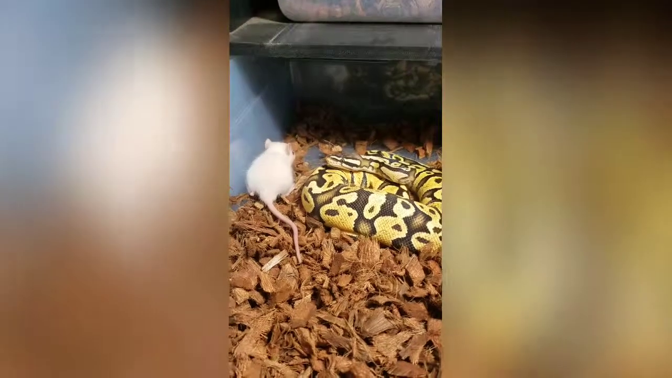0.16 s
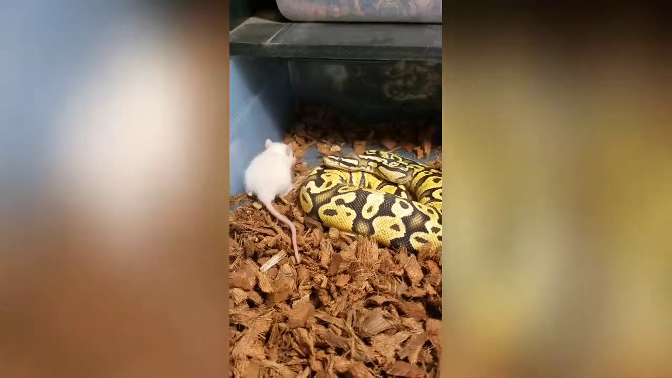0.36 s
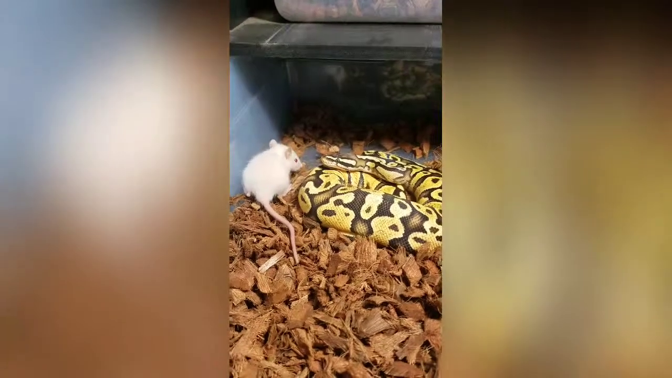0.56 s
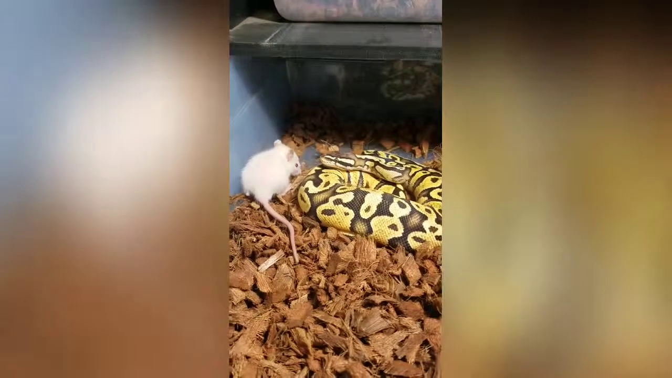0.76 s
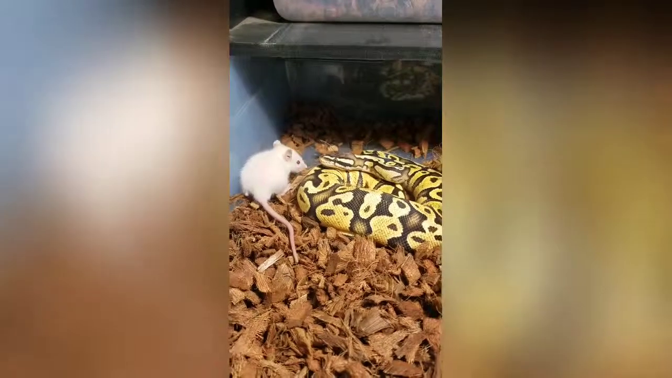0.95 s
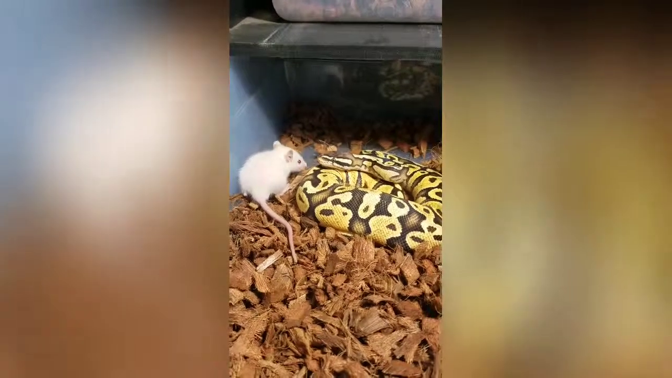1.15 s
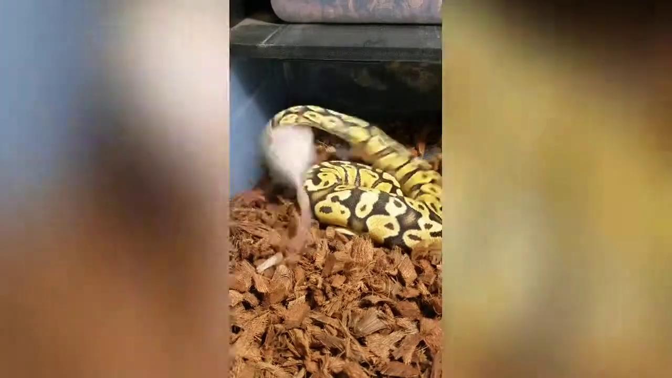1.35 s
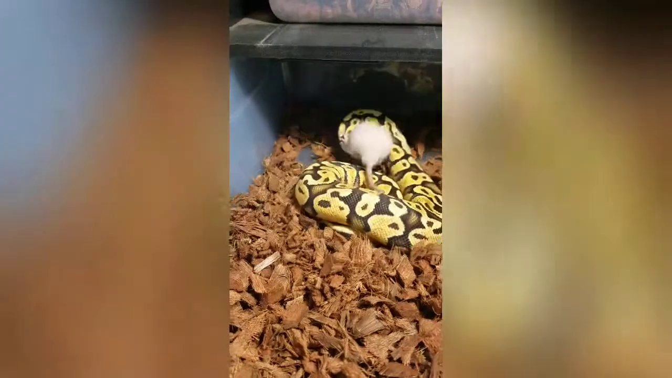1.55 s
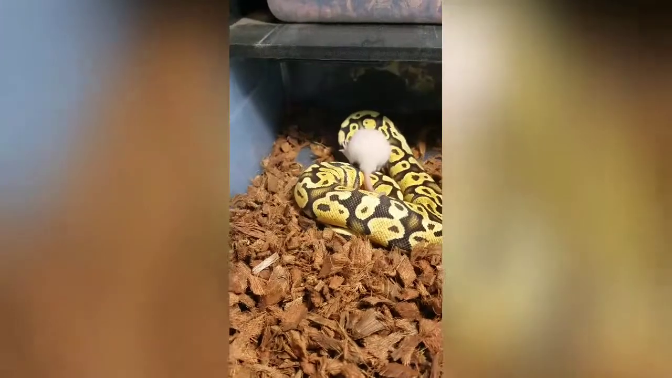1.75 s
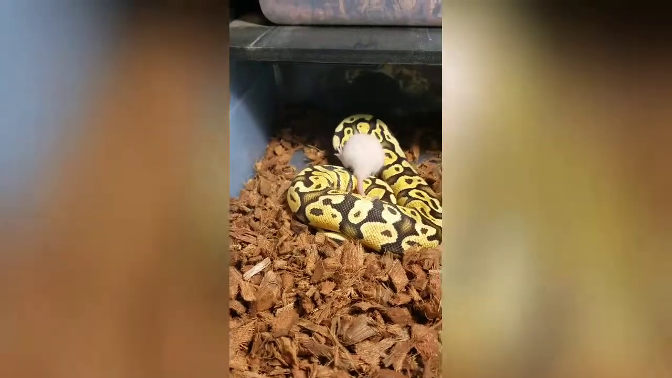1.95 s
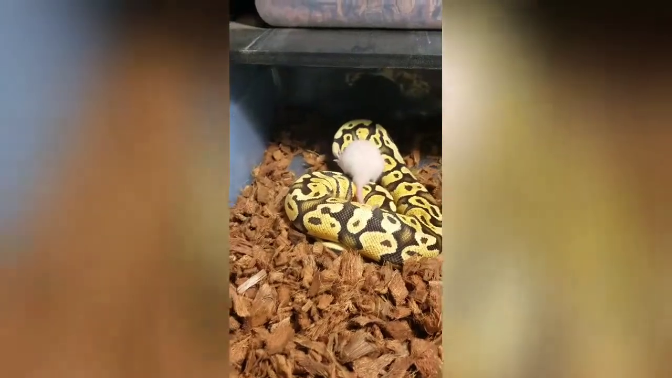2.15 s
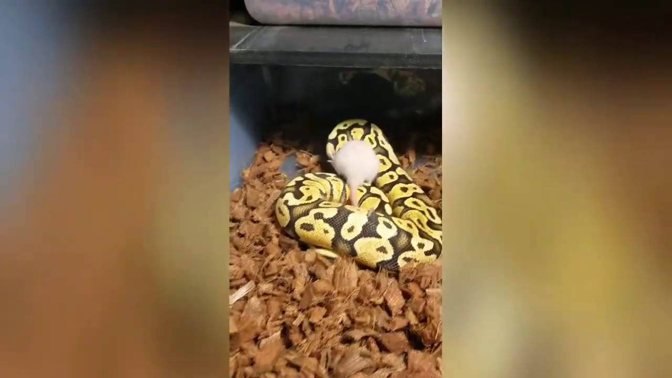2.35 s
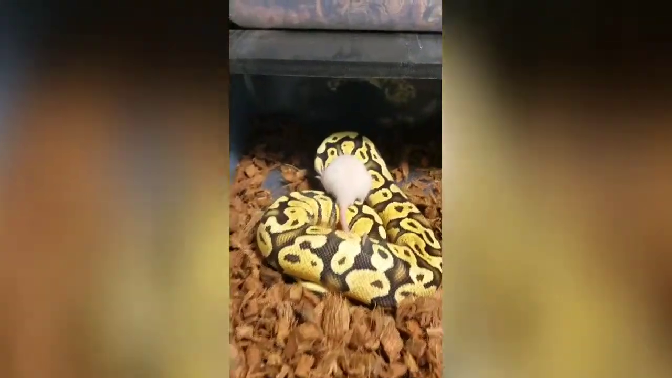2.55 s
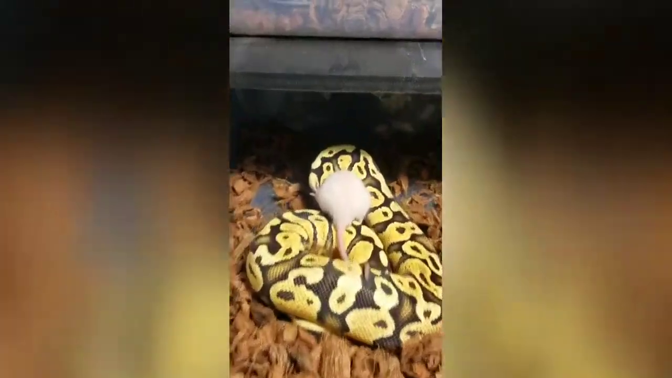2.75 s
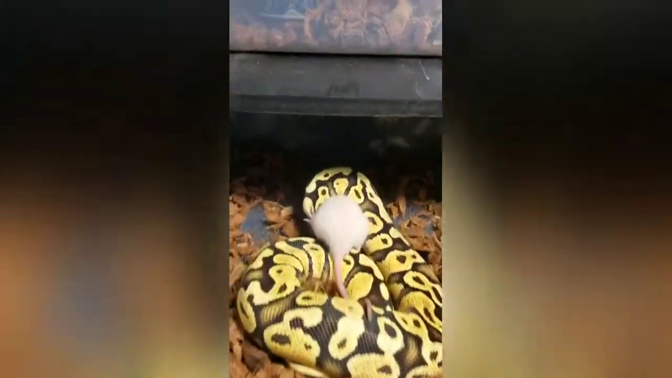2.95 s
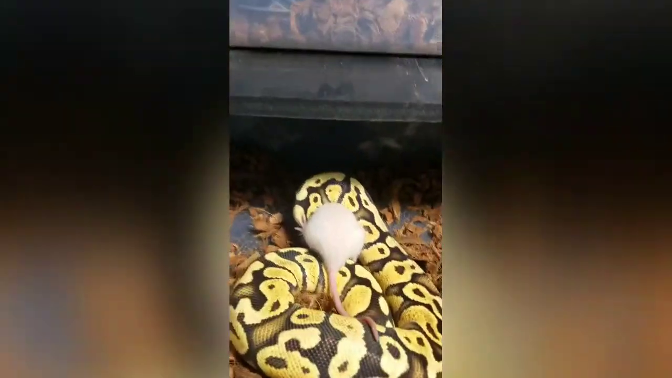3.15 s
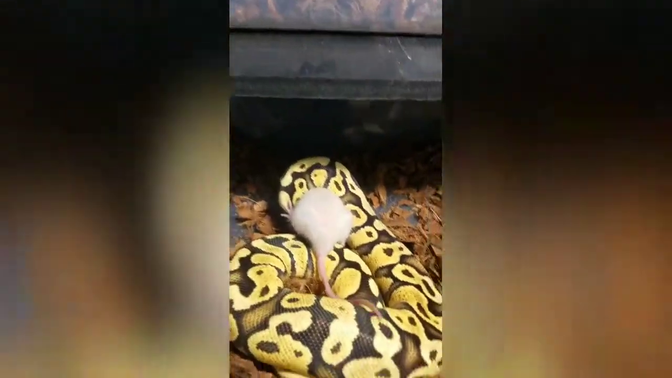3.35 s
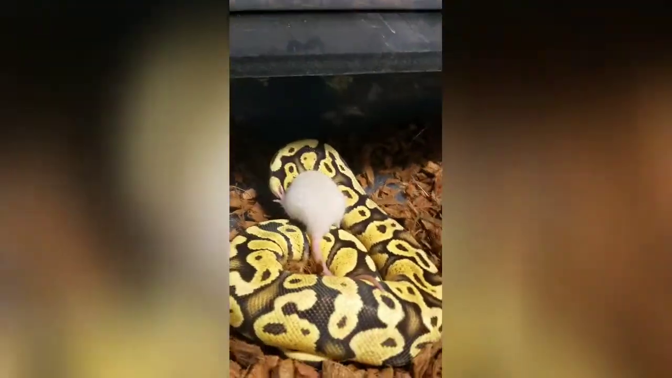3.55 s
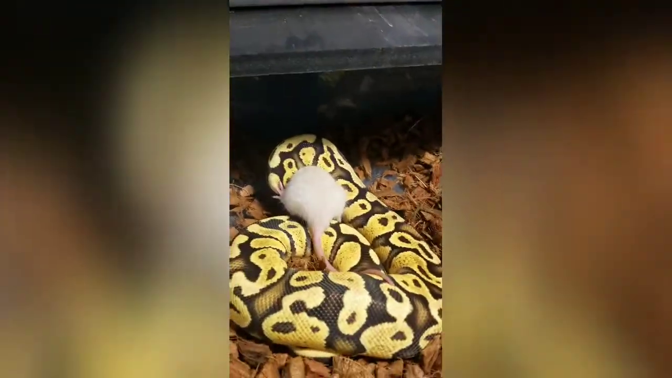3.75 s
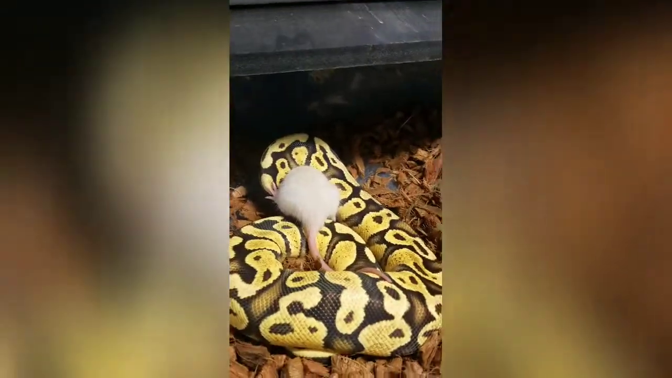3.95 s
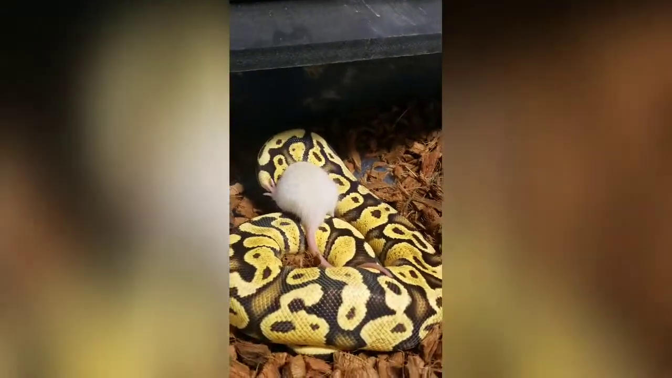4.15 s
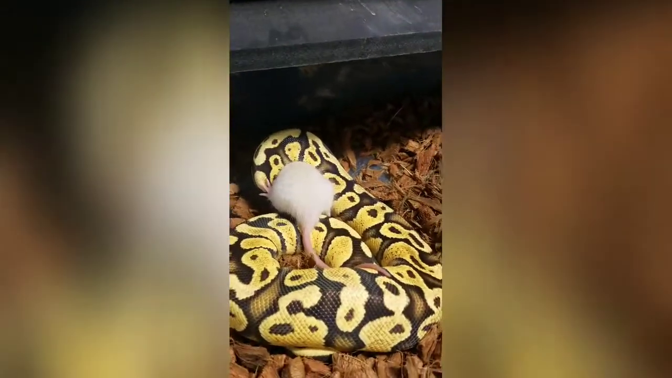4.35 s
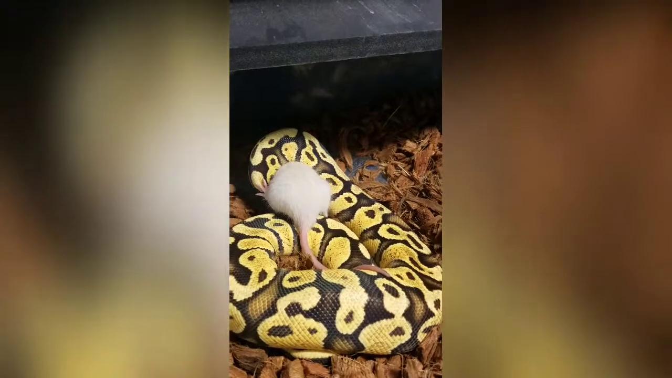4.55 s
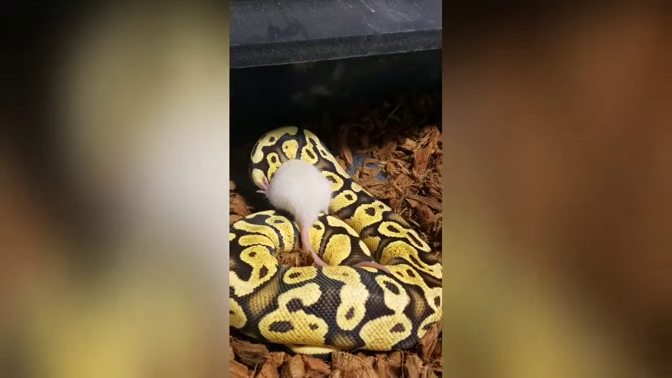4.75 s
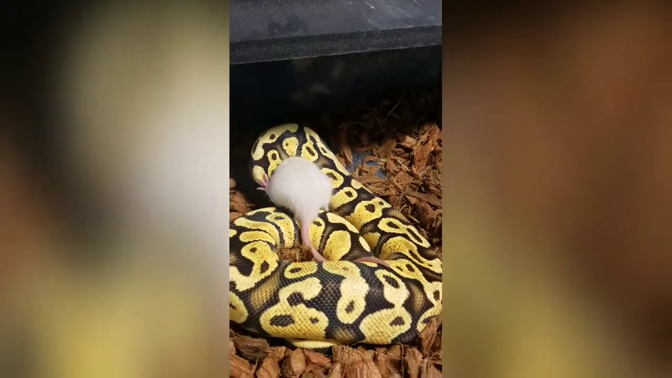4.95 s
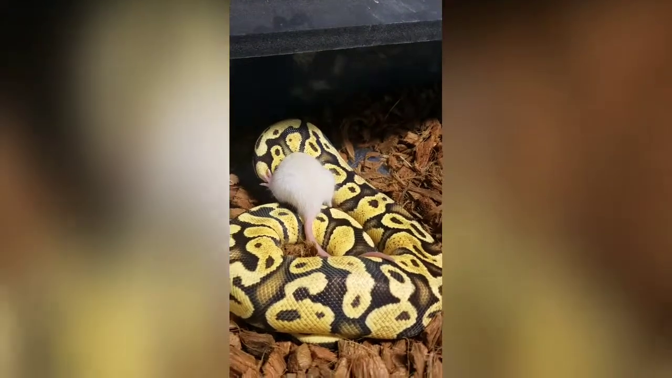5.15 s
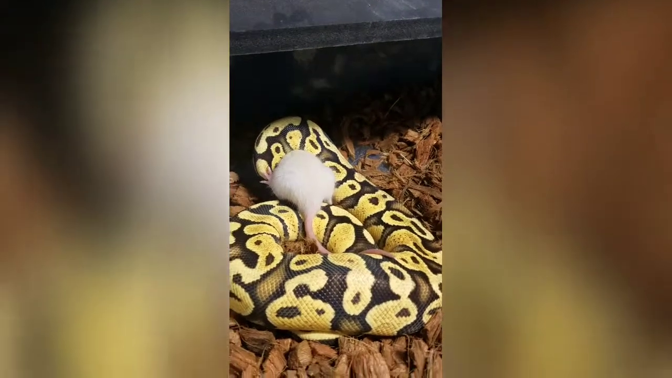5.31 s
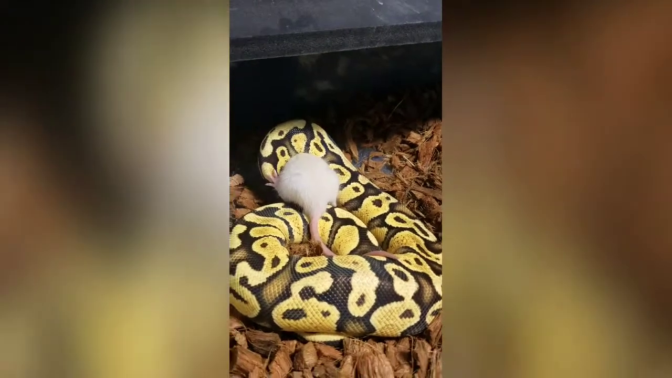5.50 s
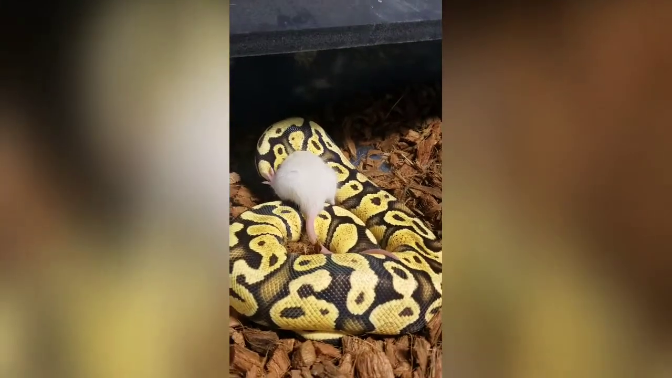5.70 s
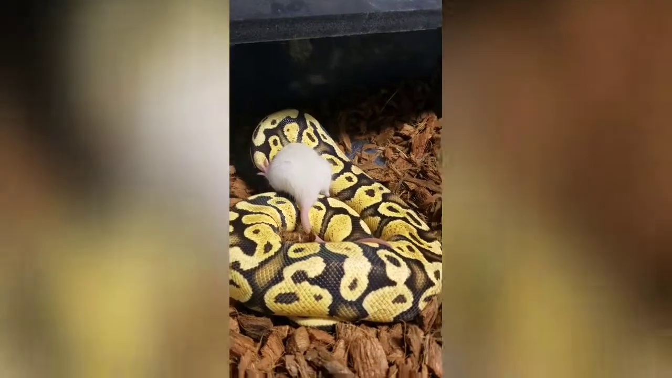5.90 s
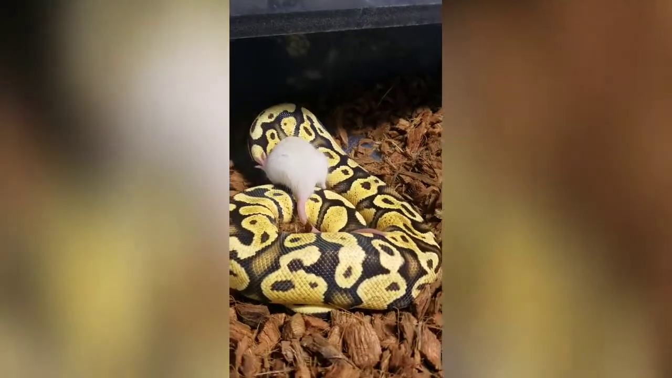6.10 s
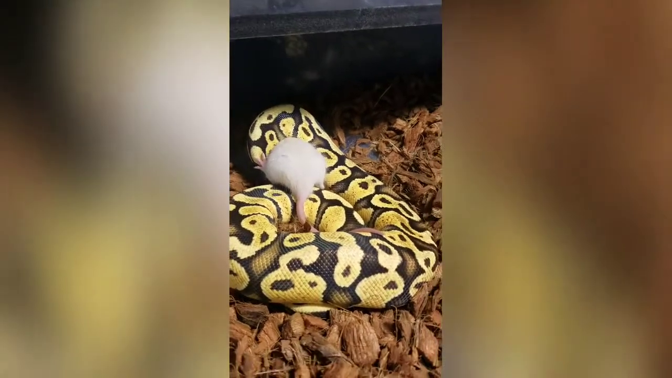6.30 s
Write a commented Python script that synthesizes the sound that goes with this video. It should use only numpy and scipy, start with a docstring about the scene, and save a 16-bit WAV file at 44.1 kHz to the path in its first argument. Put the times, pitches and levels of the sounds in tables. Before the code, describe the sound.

In a quiet room, a snake strikes with a dull boom on a plastic tub and a crackle of bark chips. A mouse at once gives a shrill, trembling squeal and a short squeak. After a pause come four more squeals, each starting raspy and clearing to a whistle, the later ones breaking into small whimpers. Bedding rustles faintly and knocks now and then, all close to the microphone.

```python
"""Snake strikes a mouse in a tub.

The plastic tub booms, close by in a quiet room. The mouse's vocal folds ring its throat in six shrill
squeals that start rasping, clear to a trembling whistle and, as it tires, break into whimpers.
Bark chips rustle and knock as the coils tighten. The recorder adds faint aliasing whistles to the cries."""
import sys
import numpy as np
from scipy import signal
from scipy.fft import rfft, irfft, next_fast_len
from scipy.io import wavfile
from scipy.ndimage import uniform_filter1d

SR = 44100
rng = np.random.default_rng(int(sys.argv[2]) if len(sys.argv) > 2 else 0)


def generate_wav(signal):
    """Clip the signal to [-1, 1] and save it as 16-bit WAV at the path in sys.argv[1]."""
    frames = np.transpose(np.atleast_2d(signal))
    scaled = np.clip(frames, -1, 1) * 32767
    pcm = np.round(scaled).astype(np.int16)
    wavfile.write(sys.argv[1], SR, pcm)


N = 280917
TIME_S = np.arange(N) / SR
TREMOR_HZ = 63.36
HALF_PER_ROUGH = 0.48  # strain doubles the period: half-pitch share per unit roughness

# squeals: t/s, length/s, attack/s, effort/dB, fade/dB, pitch/Hz, fundamental/dB, rasp/s, rasp offset/Hz,
# tremor/pitch, tremor/s, hoarseness/0-1, sag/s, sag/Hz, falter dip/dB
SQUEALS = [(1.391, 0.419, 0.034, -11, 4, 2111, 6.5, 0.079, -39.5, 0.048, 0.96, 0.13, 0.054, 212, -3),
           (2.103, 0.1, 0.0098, -14, 2.5, 2252, -3.5, 0.03, -140, 0.027, 0.6, 0.57, 0.0042, 33, 4),
           (3.575, 0.42, 0.015, -14.5, 9.5, 2133, 5, 0.07, 60.5, 0.037, 0.21, 0.22, 0.01, 10, 7),
           (4.285, 0.35, 0.0039, -13, 10.5, 2109, 3, 0.032, -130, 0.021, 0.15, 0.11, 0.068, 163, 0.5),
           (4.957, 0.333, 0.0031, -15.5, 10, 2066, 4.5, 0.05, -130, 0.039, 0.076, 0.17, 0.13, 210, 6.5),
           (5.708, 0.27, 0.0039, -14.5, 10, 2068, -0.5, 0.065, -60, 0.02, 0.087, 0.16, 0.11, 215, 6)]
# lurches within squeals: t/s, half-width/s, pitch jump/Hz, added roughness/0-1, surge/dB
LURCHES = [(1.449, 0.016, 290, 0.35, 1.5), (1.531, 0.008, -19.5, 0.4, -5), (1.593, 0.018, -85, 0.01, -1.5),
           (1.668, 0.04, 95.5, 0.08, 0), (1.793, 0.015, 23, 0.47, -7), (3.603, 0.016, 259, 0.06, 2.5),
           (3.879, 0.008, 12, 0.34, -1), (3.95, 0.044, 126, 0.56, -2), (4.489, 0.024, -25, 0.06, -0.5),
           (4.535, 0.018, 65.5, 0.38, -1.5), (4.98, 0.022, -49.5, 0, -2), (5.02, 0.008, 21, 0.05, 3.5),
           (5.215, 0.02, -45, 0.07, 0.5), (5.264, 0.012, 31, 0.06, 1.5), (5.932, 0.015, -9, 0.08, 0.5)]
# whimpers: t/s, length/s, effort/dB, fade/dB, pitch/Hz, sag/Hz, roughness/0-1
WHIMPERS = [(4.627, 0.058, -28.5, 17, 1412, 90, 0.68), (5.28, 0.112, -25.5, 7.5, 1369, 261, 0.3),
            (5.39, 0.038, -27, 7.5, 1224, 60, 0.54), (5.972, 0.027, -27, 3, 1403, 237, 0.52),
            (5.995, 0.062, -33, 6.5, 1132, 70, 0.54), (6.048, 0.11, -35, 3.5, 1439, 110, 0.45),
            (6.166, 0.05, -28.5, 22, 1357, 90, 0.5)]
# throat and mouth response: f/Hz, level/dB
THROAT = [(1000, -21), (1400, -18), (2100, -21.5), (2800, -14), (3500, -13), (4250, -6), (5000, -11.5),
          (6300, 3), (7400, -2), (8300, -14.5), (9200, -19), (11700, -14), (15500, -20)]
# breath through the mouth: f/Hz, level/dB
BREATH = [(300, -23), (1200, -13.5), (2000, -17.5), (2900, -10.5), (3800, -9.5), (5200, -6.5), (6000, -21),
          (6900, -3.5), (7700, -8), (8700, -18), (11000, -17), (15500, -25)]
# recorder aliasing of the cries: harmonic number, mirror f/Hz
ALIASES = [(3, 6000), (4, 6000), (5, 12000)]
# weight per alias: level/dB
ALIAS_DB = [-28.5, -20, -22.5]
# cries, left minus right: f/Hz, level/dB
BALANCE = [(500, -9.5), (2000, -4.5), (3300, -9.5), (4150, -10.5), (5700, -3.5), (6500, -7.5), (7600, -9),
           (9000, -9.5), (10200, -3.5), (11600, 15.5), (13000, -0.5), (14500, 6)]
# microphone moves closer: start t/s, end t/s
MOVE_IN_S = [2.4, 3.4]
# bodies hitting the tub: t/s, boom/dB, knock/dB, crackle/dB, bedding t60/s
BUMPS = [(0.753, -67, -51.5, -65, 0.15), (1.286, -19.5, -22.5, -24.5, 0.11),
         (1.394, -35.5, -20.5, -52, 0.061), (1.517, -40, -19.5, -27, 0.057), (1.539, -37, -22, -24.5, .12),
         (2.382, -72.5, -36.5, -83.5, 0.065), (2.812, -53.5, -33.5, -56, 0.055),
         (2.932, -61, -41, -55, 0.053), (2.953, -76, -43, -59.5, 0.065),
         (3.27, -64.5, -39.5, -57.5, 0.0397), (3.379, -60, -66.5, -36, 0.017),
         (3.622, -45, -24.5, -39, 0.1), (6.085, -41.5, -41.5, -45, 0.11), (6.132, -35.5, -29, -51, 0.12),
         (6.173, -59.5, -25, -62, 0.052)]
# tub floor modes: f/Hz, level/dB, t60/s
TUB_MODES = [(99, 0, .37), (140, -17, .14)]
# bark chip spectra: f/Hz, level/dB
KNOCK = [(60, -15.5), (135, 10), (310, -3.5), (480, -3.5), (750, -19.5), (1500, -25), (4000, -50.5),
         (16000, -68)]
CRACKLE = [(200, -0.5), (700, -4.5), (1400, 9), (3000, 2), (5000, -4.5), (7500, -4), (10000, -23.5),
           (16000, -27.5)]
RUSTLE = [(50, -23.5), (160, 12), (420, -1), (800, -7), (2400, -8.5), (5000, -18.5), (7500, -16),
          (10000, -29), (16000, -29.5)]
# lunge, then coils: peak t/s, level/dB, rise/(dB/s), fade/(dB/s)
SLIDES = [(1.278, -31, 900, 52), (2.2, -57.5, 71.5, 17.5), (3.8, -54.5, 36.5, 4.5)]
# room decay: f/Hz, t60/s
ROOM_T60 = [(200, 0.17), (1300, 0.21), (3500, 0.51), (6500, 0.39), (13000, 0.39)]
# room colour of the cries: f/Hz, level/dB
ROOM_COLOUR = [(2000, 9), (3000, 3), (4200, -5), (5200, 3.5), (6500, 3.5), (14000, -5.5)]
# room air spectrum: f/Hz, level/dB
AIR = [(15, -44), (25, -17), (123, 0.89), (157, -10), (285, -7), (309, -15), (439, -7), (531, -23),
       (575, -16), (734, -15), (1650, -29), (2350, -27), (4870, -37), (7510, -40), (16000, -51)]
# room air, left to right: f/Hz, coherence (clipped to 0-1)
AIR_COHERENCE = [(60, -1.9), (180, 1), (550, 0.97), (1650, 0.03), (4970, 0.78), (15000, 0.47)]


def squeal(s, length_s, attack_s, effort_db, fade_db, pitch_hz, fundamental_db, rasp_s, offset_hz,
           tremor, tremor_s, hoarse, sag_s, sag_hz, falter_db):
    """A cry starts rasping, clears to a trembling whistle, steadies as it tires, sags and breaks."""
    t = np.arange(0, length_s, 1 / SR)
    rasping = np.exp(-(t / rasp_s) ** 6)
    sag = np.clip(1 - (length_s - t) / sag_s, 0, 1)
    breaking = 0.67 * np.exp((t - length_s) / 0.008)
    hz = pitch_hz + offset_hz * rasping - sag_hz * (sag + breaking)
    trembling = bell(t, 0, tremor_s)
    strain = hoarse * (0.51 + 0.49 * trembling)
    level_db = effort_db - 17.5 * np.exp(-t / attack_s) - 4.5 * rasping - fade_db * (t / length_s) ** 2
    level_db -= falter_db * bell(sag, centre=0.35, width=0.16)
    for at_s, width_s, jump_hz, crack, surge_db in LURCHES:
        lurch = bell(s + t, at_s, width_s)
        hz += jump_hz * lurch
        strain += crack * lurch
        level_db += surge_db * lurch
    rough = strain + 0.75 * (1 - hoarse) * bell(t, 0, .8 * rasp_s)
    half_pitch = np.clip(rasping + HALF_PER_ROUGH * strain, 0, 1)
    return s, voice(s, level_db, hz, 0.004 + tremor * trembling, rough, half_pitch, fundamental_db)


def whimper(s, length_s, effort_db, fade_db, pitch_hz, sag_hz, rough):
    """The last of the air drives a lower register that quavers, droops and fades."""
    progress = np.arange(0, length_s, 1 / SR) / length_s
    quaver = 1 + 0.0414 * rough * wander(len(progress), hz=35.1)
    hz = (pitch_hz - sag_hz * progress ** 4) * quaver
    level_db = effort_db - fade_db * progress ** 2
    return s, voice(s, level_db, hz, tremor=0.024 * rough, rough=rough,
                    half_pitch=HALF_PER_ROUGH * rough, fundamental_db=7.5)


def voice(s, effort_db, hz, tremor, rough, half_pitch, fundamental_db, onset_s=0.0015, release_s=0.007):
    """Trembling vocal folds ring the throat, air rasps past in puffs; recorder aliasing is mixed in."""
    rough, count = np.clip(rough, 0, 1), len(hz)
    t = s + np.arange(count) / SR
    tremor_rad = 2 * np.pi * np.cumsum(TREMOR_HZ * (1 + .22 * wander(count, 40))) / SR
    swing = np.sin(tremor_rad) - 0.36 * np.sin(2 * tremor_rad)  # slow climb, fast drop
    jitter = .04 * rough * wander(count, 300) + (.035 * rough + .4 * tremor) * wander(count, 1400)
    hz = hz * (1 + tremor * swing + jitter)
    cycles = np.cumsum(hz) / SR

    def partial(k):
        shimmer_db = min(k, 5) * (.4 + .6 * rough + 6 * tremor) * wander(count, 110)
        return from_db(shimmer_db) * np.cos(2 * np.pi * k * cycles) * (k * hz < SR / 2)

    seized_db = 21.5 * bell(t, SQUEALS[0][0], 0.082)  # stronger fundamental when first seized
    folds = from_db(fundamental_db + seized_db) * partial(1) + sum(partial(k) for k in range(2, 15))
    # alternating strong and weak cycles put lines between the harmonics
    folds += sum(np.maximum(half_pitch, 0.045 * k) * partial(k + .5) for k in range(15))
    tone = colour(folds, THROAT)
    tone /= np.sqrt(abs(uniform_filter1d(tone ** 2, size=400)) + 1e-12)  # running rms to 1
    tone += aliasing(t, cycles) * from_db(0.06 * (effort_db + 32)) * (1 - rough)
    puffs = (1 + .5 * np.cos(np.pi * cycles)) * rng.standard_normal(count)
    breath_share = np.clip(from_db(-33) + rough * (1 + rough) / 2, 0, 1)
    sound = np.sqrt(1 - breath_share ** 2) * tone + breath_share * unit(colour(puffs, BREATH))
    flutter_db = (0.4 + 18 * tremor) * np.sin(tremor_rad + 1.6) + 1.8 * rough * wander(count, 200)
    gate = np.clip((t - s) / onset_s, 0, 1) * np.clip((t[-1] - t) / release_s, 0, 1)
    return from_db(effort_db + flutter_db) * sound * gate


def aliasing(t, cycles):
    """The recorder folds harmonics down into faint whistles that glide with and against the pitch."""
    return sum(from_db(db) * np.cos(2 * np.pi * (k * cycles - mirror_hz * t))
               for (k, mirror_hz), db in zip(ALIASES, ALIAS_DB))


def at_ports(s, cry, far_lag_s=0.000355, near_lag_s=0.0004117):
    """Two microphone ports colour a cry differently; the left lags more at close range."""
    hz = np.fft.rfftfreq(SR, 1 / SR)
    ratio = from_db(read(BALANCE, hz))
    lag_s = np.interp(s, MOVE_IN_S, [far_lag_s, near_lag_s])
    ports = np.array([ratio * np.exp(-2j * np.pi * hz * lag_s), np.ones(len(hz))])
    ports *= np.sqrt(2 / (1 + ratio ** 2))
    shade = from_db(-5 * (s < 3) * (hz / 14000) ** 2)  # early, farther cries lose treble
    return irfft(rfft(cry, SR) * shade * ports, SR)[:, :SR * 3 // 4]


def bump(boom_db, knock_db, crackle_db, bedding_t60_s, rise_s=0.0014):
    """A body lands: the tub floor booms, the bedding knocks and crackles."""
    t = np.arange(SR // 2) / SR
    decay = lambda t60_s: np.exp(-np.log(1000) * t / t60_s)
    boom = sum(from_db(db) * decay(t60_s) * np.sin(2 * np.pi * hz * t) for hz, db, t60_s in TUB_MODES)
    bedding = from_db(knock_db) * chips(len(t), KNOCK) + from_db(crackle_db) * chips(len(t), CRACKLE)
    return from_db(boom_db) * boom + bedding * decay(bedding_t60_s) * (1 - np.exp(-t / rise_s))


def slide():
    """Scales slide through the chips; each move swells and dies away."""
    envelope = sum(from_db(db - np.maximum(rise * (s - TIME_S), fade * (TIME_S - s)))
                   for s, db, rise, fade in SLIDES)
    return envelope * chips(N, RUSTLE, per_s=20000, spread_db=2)


def chips(count, spectrum, per_s=9000, spread_db=3.0):
    """Many tiny snaps of bark, partly shared by both ports."""
    snaps = rng.standard_normal((3, count)) * (rng.random((3, count)) < per_s / SR)
    snaps *= from_db(spread_db * np.minimum(rng.exponential(1, (3, count)), 4))
    return unit(colour(snaps[:2] + 2 * snaps[2], spectrum))


def echoes(x, t60_points, start_s, per_s=4000):
    """Sparse reflections of random sign; each band decays at its own rate."""
    taps = rng.choice([-1., 1.], (2, SR)) * (rng.random((2, SR)) < per_s / SR)
    taps *= np.arange(SR) > start_s * SR
    hz, t, bands = signal.stft(taps, SR, nperseg=128)
    decay = from_db(-60 * t / read(t60_points, hz)[:, None])
    tail = signal.istft(bands * decay, SR, nperseg=128)[1]
    return signal.fftconvolve(x, tail / np.linalg.norm(tail, axis=1, keepdims=True), axes=1)[:, :N]


def air(level_db=-57.5):
    """Steady low room noise, nearly alike on both sides in the upper bass."""
    hz = np.fft.rfftfreq(N, 1 / SR)
    left, independent = rfft(rng.standard_normal((2, N)))
    shared = np.sqrt(np.clip(read(AIR_COHERENCE, hz), 0, 1))
    pair = np.array([left, shared * left + np.sqrt(1 - shared ** 2) * independent])
    return from_db(level_db) * unit(irfft(pair * from_db(read(AIR, hz)), N))


def from_db(db):
    """Decibels to gain."""
    return 10 ** (np.asarray(db) / 20)


def unit(x):
    """Scales to rms 1."""
    return x / np.sqrt(np.mean(x ** 2) + 1e-20)


def bell(t, centre, width):
    """Gaussian of height 1."""
    return np.exp(-((t - centre) / width) ** 2)


def read(points, hz):
    """Interpolates a table over log frequency."""
    table_hz, value = np.transpose(points)
    return np.interp(np.log(hz + 1), np.log(table_hz + 1), value)


def add(mix, s, sound):
    """Mixes a sound in at time s."""
    part = mix[..., round(s * SR):][..., :sound.shape[-1]]
    part += sound[..., :part.shape[-1]]


def colour(x, points, size=1024):
    """Minimum-phase filter with the given spectrum."""
    log_gain = np.log(from_db(read(points, abs(np.fft.fftfreq(size, 1 / SR)))))
    taps = np.fft.ifft(np.exp(np.conj(signal.hilbert(log_gain)))).real
    return signal.lfilter(taps[:size // 2], [1], x)


def wander(count, hz):
    """Smooth, bounded random motion, mostly below hz."""
    size = next_fast_len(count, True)
    rolloff = (1 + (np.fft.rfftfreq(size, 1 / SR) / hz) ** 2) ** 2
    drift = irfft(rfft(rng.standard_normal(size)) / rolloff, size)
    return unit(np.tanh(unit(drift)))[:count]


def scene(far_room_db=-19.5, near_room_db=-22, bedding_room_db=-18, walls_db=-8):
    """Mouse, bedding, close tub walls and the room around them."""
    mouse, in_tub, bedding = np.zeros(N), np.zeros((2, N)), slide()
    for s, cry in [squeal(*row) for row in SQUEALS] + [whimper(*row) for row in WHIMPERS]:
        direct = at_ports(s, cry)
        # mouse and microphone move, so the walls answer each cry differently
        walls = echoes(direct, t60_points=[(500, .04), (10000, .03)], start_s=.0015)
        add(mouse, s, cry)
        add(in_tub, s, direct)
        add(in_tub, s, from_db(walls_db) * walls)
    for s, *impact in BUMPS:
        add(bedding, s, bump(*impact))
    wet = from_db(np.interp(TIME_S, MOVE_IN_S, [far_room_db, near_room_db]))
    # the boom stays in the tub; knocks and crackle reach the room
    spill = signal.sosfilt(signal.butter(2, 200, "highpass", fs=SR, output="sos"), bedding)
    to_room = wet * colour(mouse, ROOM_COLOUR) + from_db(bedding_room_db) * spill
    return in_tub + bedding + echoes(to_room, ROOM_T60, start_s=0.0098) + air()


def record(dry, ceiling=0.88, cutoff_hz=16150):
    """Hard ceiling, then band limit."""
    low_pass = signal.firwin(511, cutoff_hz, window=("kaiser", 8), fs=SR)
    return signal.oaconvolve(np.clip(dry, -ceiling, ceiling), low_pass[None], "same")


dry = scene()
out = record(dry)
generate_wav(out)
```